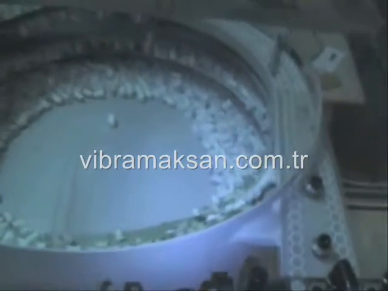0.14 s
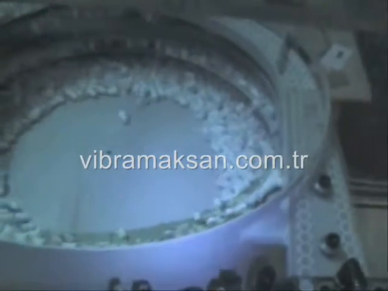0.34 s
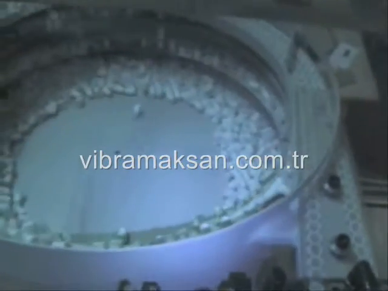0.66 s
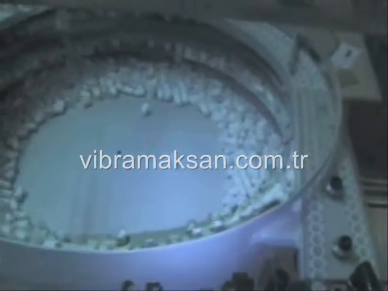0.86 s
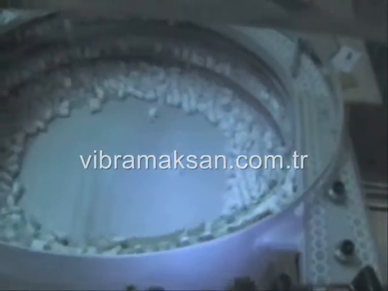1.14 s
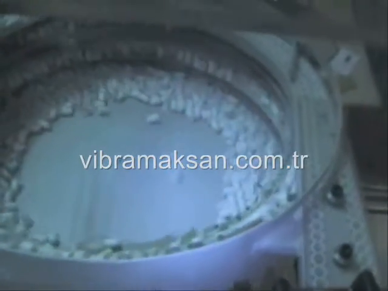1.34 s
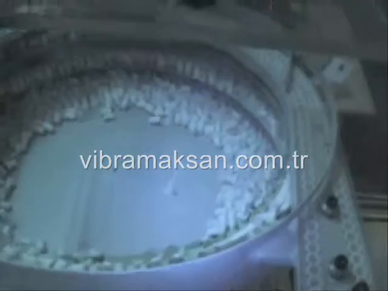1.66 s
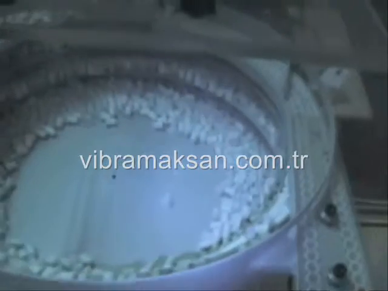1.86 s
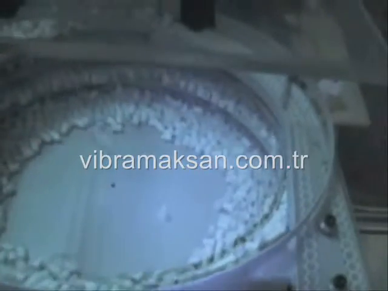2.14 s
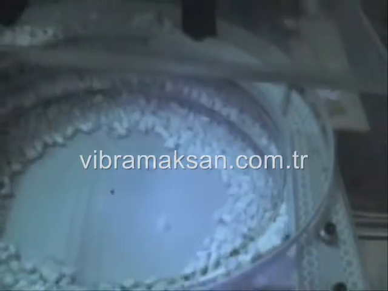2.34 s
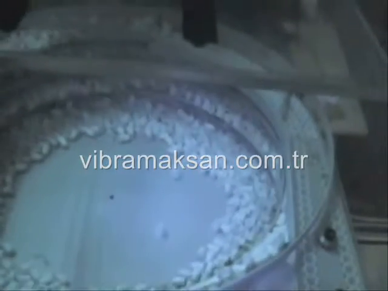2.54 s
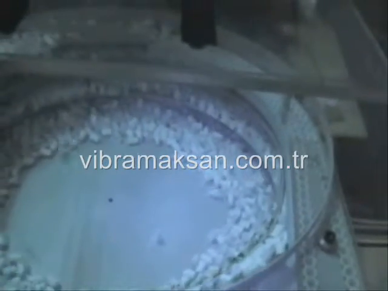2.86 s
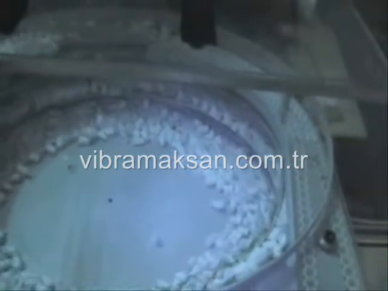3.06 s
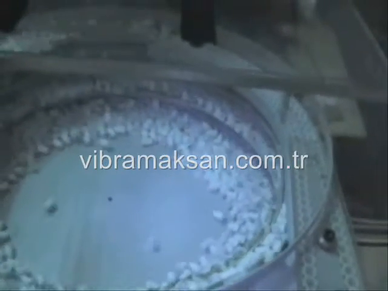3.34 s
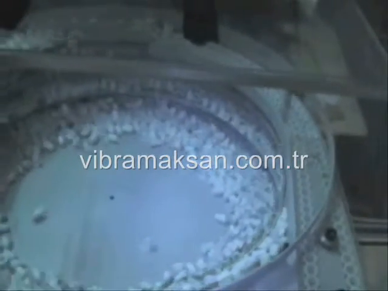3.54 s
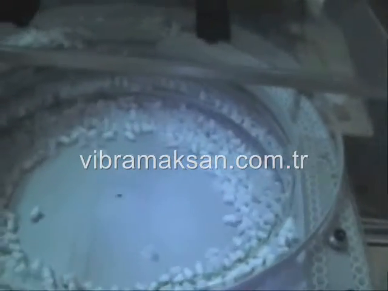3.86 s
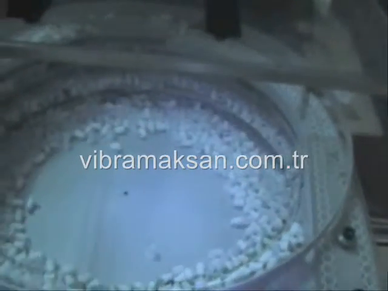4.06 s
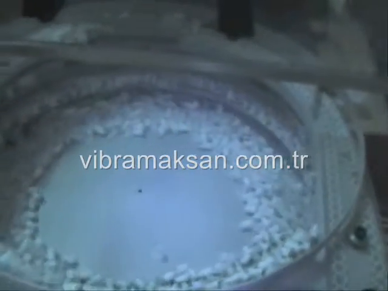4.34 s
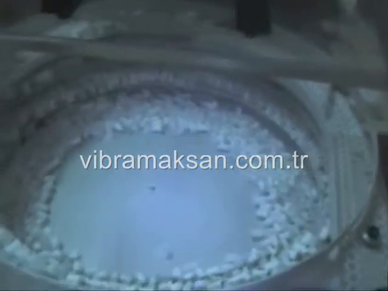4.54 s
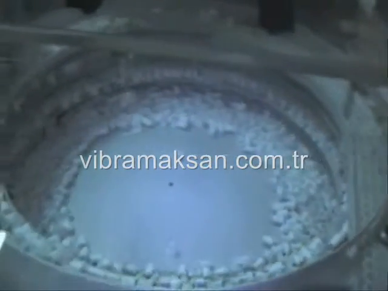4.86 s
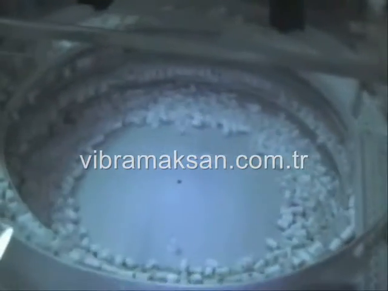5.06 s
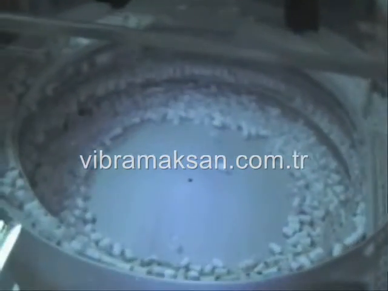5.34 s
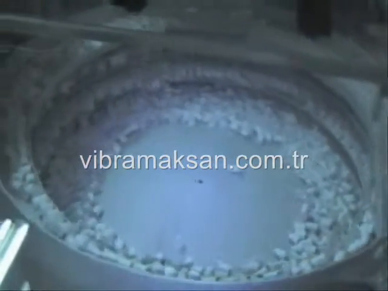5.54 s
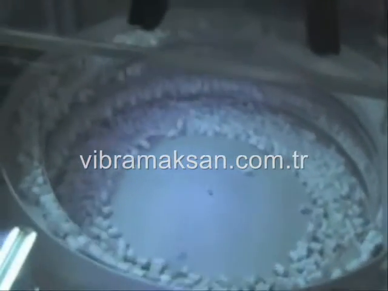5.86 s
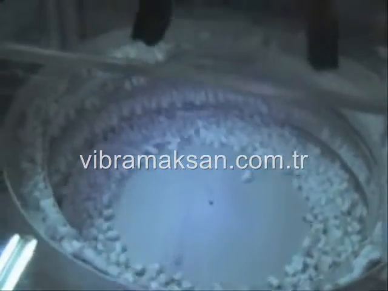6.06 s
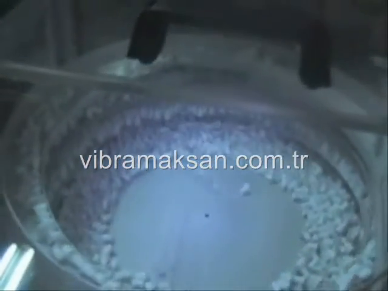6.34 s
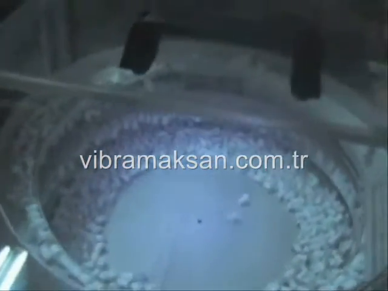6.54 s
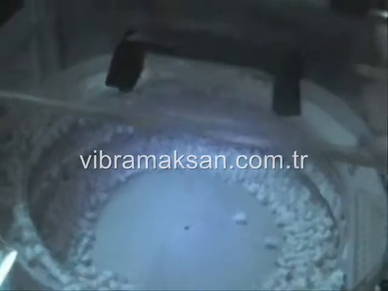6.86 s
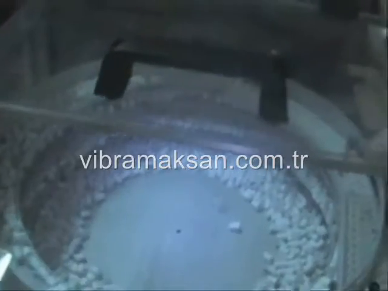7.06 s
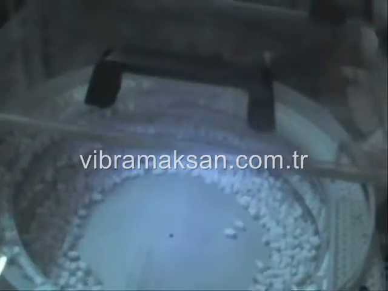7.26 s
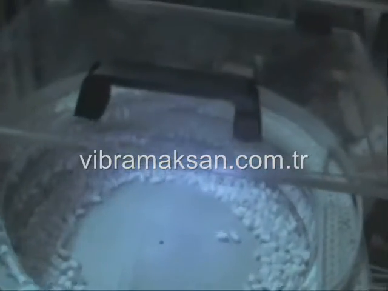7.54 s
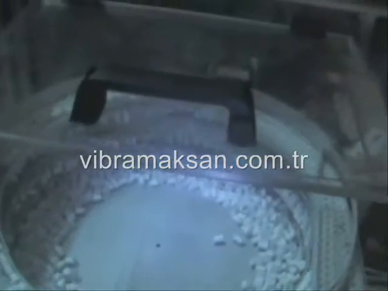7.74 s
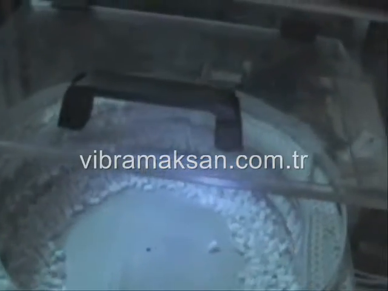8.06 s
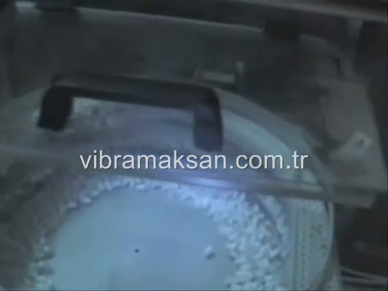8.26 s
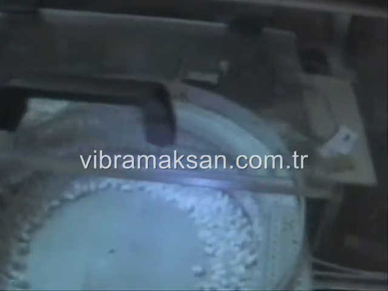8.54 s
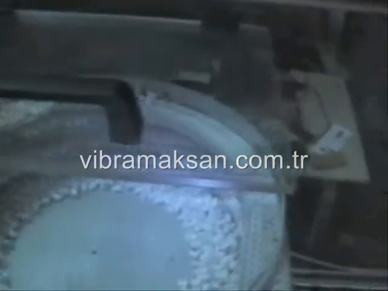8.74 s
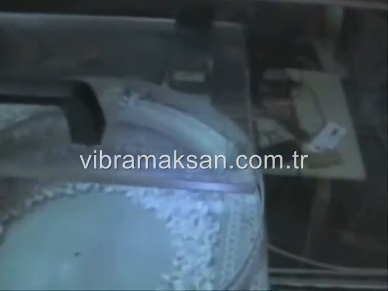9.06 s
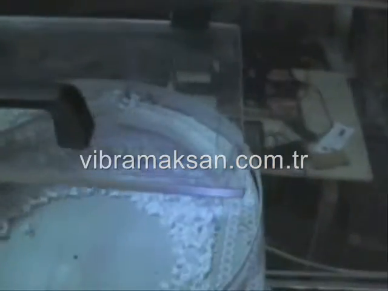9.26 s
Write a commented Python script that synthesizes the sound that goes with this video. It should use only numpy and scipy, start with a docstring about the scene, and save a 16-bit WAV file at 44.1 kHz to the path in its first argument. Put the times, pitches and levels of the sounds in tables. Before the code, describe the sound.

A vibratory bowl feeder runs from start to finish, about nine and a half seconds, heard close up on a factory floor. The main sound is a dense, bright, hissy rattle of hundreds of small plastic parts hopping in a steel bowl, which rings faintly under them. With it comes a steady, mid-pitched electric buzz and a hollow drumming from the bowl's floor. Other machines hum softly behind. Single parts drop with light clicks, half buried in the rattle, several in the first four seconds and a few more around 5.7 and 7 seconds. From about 3.7 to 8.5 seconds the microphone draws back, and the buzz and rattle soften just a little. Around 9 seconds the tone of the buzz and the metallic ring shifts slightly, while the machine keeps running at the same pace.

```python
"""Vibratory bowl feeder, close up

On a factory floor, a hand-held stereo microphone stays close to the feeder's clear cover, draws back,
then swings past the rim. A magnet tugs the steel bowl once per mains cycle: the bowl buzzes, and hundreds
of small plastic parts hop and land on every stroke, ringing the bowl and the space under the cover.
Now and then a part drops off the track. Other machines hum in the background."""
import sys
import numpy as np
from scipy import signal
from scipy.fft import rfft, irfft
from scipy.io import wavfile

SR = 44100
rng = np.random.default_rng(int(sys.argv[2]) if len(sys.argv) > 2 else 0)


def wav_record(signal):
    """Record a signal, one row per channel, as 16-bit PCM in the file named by sys.argv[1]."""
    frames = np.transpose(np.atleast_2d(signal))
    bounded = np.clip(frames, -1, 1)
    # unit amplitude maps onto the largest positive 16-bit level
    quanta = np.round(bounded * 32767).astype(np.int16)
    wavfile.write(sys.argv[1], SR, quanta)


N = 414540
TIME, FREQ = np.arange(N) / SR, np.fft.rfftfreq(N, 1 / SR)

# overtones of the bowl's stroke: (multiple, level [dB])
OVERTONES = [(2, -47), (3, -43.2), (4, -42.7), (5, -44.2), (6, -33), (7, -31.4), (8, -31.4), (9, -36.2),
             (10, -25.7), (11, -35), (12, -41), (13, -25.6), (14, -46), (15, -36.1), (16, -38.5), (17, -48),
             (18, -42.3), (19, -51), (20, -43), (21, -46), (22, -44.5), (23, -49)]
# the loudest overtone's standing wave along the microphone's path: (time [s], relative level [dB])
DRONE_PATH = [(0, -24.5), (0.6, -24.5), (1.5, -26.5), (3.8, -25), (6.2, -27.5), (7.6, -25.5), (8.0, -27.5),
              (8.8, -25.5), (9.2, -31)]
# nodes and bellies of the overtones past the rim: (multiple, change [dB])
PAST_RIM = [(6, -2.5), (7, 1.2), (8, -2.5), (9, 1.8), (12, 4.5), (14, 10), (16, 3), (17, -6), (18, 2)]
# colour of a part's landing: (frequency [Hz], level [dB])
LANDING_COLOUR = [(500, -4.5), (950, -5), (1100, 1), (1250, -0.8), (1400, 0.75), (2400, 2.5), (2950, -2.5),
                  (3900, -3), (4900, -2), (6400, -1.9), (8300, -3), (10000, -4.5), (11100, -6.5),
                  (12300, -16), (13000, -33)]
# modes of the steel bowl, each loudest as the microphone passes over its belly:
# (frequency [Hz], width [Hz], relative level [dB], loudest at [s], for about [s])
BOWL_MODES = [(1122, 29, -5.5, 1.6, 12), (1440, 43, 5, 8.9, 3.2), (1703, 28, 4, 3.7, 1.6),
              (1880, 190, -5.5, 3.2, 3.8), (2197, 20, 2, 2.2, 6.7), (2420, 25, -16, 3.5, 12),
              (2625, 68, 2, 1.1, 1.4), (3110, 62, -1.5, 6.7, 3.7), (3550, 62, 2.5, 0.95, 2),
              (3618, 33, 1.5, 5.5, 12), (4320, 60, 4.5, 0.96, 3.2), (4590, 50, 0, 8.6, 6.1),
              (4820, 150, 0, 3.7, 4.4), (6010, 190, -1, 1.2, 7.7), (6070, 150, 1.5, 9.4, .8),
              (6600, 160, 1, 9, 1), (6320, 130, -1, 2.9, 5.8), (7330, 390, -3.5, 2.4, 14),
              (8100, 170, -7, .8, 4), (8850, 130, 1, 4.9, 7.2), (10000, 230, 0, 3.3, 0.92),
              (9920, 140, 1, 9, 1.5)]
# sharp ticking that beams up out of the bowl, along the microphone's path: (time [s], level [dB])
TICKING_PATH = [(0, -25), (2.6, -24.5), (3.4, -23), (4.7, -23.3), (5.3, -24.5), (7.2, -23.5), (7.9, -25.0),
                (9.4, -26.5)]
# brief swells and lulls of the rattle: (time [s], length [s], change [dB])
RATTLE_SURGES = [(1.09, .08, 1.7), (3.57, 0.13, -1.2), (4.146, .12, 1.7)]
# colour of the bowl's floor drumming under the load: (frequency [Hz], level [dB])
FLOOR_COLOUR = [(25, -24.5), (110, -22.5), (160, -18), (220, -9.5), (300, -12.5), (420, -7), (490, -4),
                (550, 2.5), (590, 0), (630, -7.5), (770, -12), (835, -2), (930, -17.5), (2000, -39)]
# single parts dropping off the track: (time [s], relative level [dB])
PART_DROPS = [(0.3454, -16), (0.839, -13), (0.9824, -13), (1.0254, -14), (1.7659, -10), (2.266, -9),
              (3.047, -14), (3.4732, -14), (3.9164, -18), (5.6286, -17), (5.7494, -12), (6.9195, -10),
              (7.0918, -10), (8.7814, -19)]
# hums of the neighbouring machines: (frequency [Hz], level [dB])
MACHINE_HUMS = [(98.25, -54.5), (228.4, -38.3), (685.2, -44), (865.6, -42.5)]
# stereo width at the microphone: (frequency [Hz], side relative to mid [dB])
STEREO_WIDTH = [(30, 0), (70, 1), (200, -13), (500, -11), (1000, -11.5), (2000, -12.5), (4000, -7.5),
                (8000, -7), (12000, -3.5)]

STROKE_HZ = 50.005
DRONE_MULTIPLE = 13  # the loudest overtone
FILLING_MULTIPLES = (2, 3, 4, 5, 10, 11, 12, 14, 15)  # fill the space under the cover and do not fade
DRAW_BACK_START_S, DRAW_BACK_END_S = 3.7, 8.5
BUZZ_FADE_DB_PER_S, DRUM_FADE_DB_PER_S, RATTLE_FADE_DB_PER_S = 0.58, 0.5, 0.14  # while drawing back
SWING_MIDDLE_S, SWING_LENGTH_S = 9.35, .4


def bowl_buzz(waver=0.025, load_waver=0.01, wander_db=0.36, gain_db=0.17, steps=2048):
    """One tug a stroke gives a stack of overtones; the shifting load makes each waver."""
    slow_time = np.linspace(0, N / SR, steps)
    jitter = signal.lfilter([1], [1, -.85], rng.standard_normal((len(OVERTONES), 2, steps))) / 2
    load = 1 + load_waver * walk(22)
    out = np.zeros((2, N))
    for (multiple, db), (shiver, slip) in zip(OVERTONES, jitter):
        hz = multiple * STROKE_HZ
        drift_db = wander_db * multiple / DRONE_MULTIPLE * walk(2, slow_time)  # higher ones wander more
        level_db = db + gain_db + standing_wave(multiple, slow_time) + drift_db
        strength = np.interp(TIME, slow_time, undb(level_db) * (1 + waver * shiver))
        phase = 2 * np.pi * hz * TIME + np.interp(TIME, slow_time, waver * slip - bowl_lag(hz))
        tone = np.sqrt(2) * strength * np.cos(phase)
        lean = 0.034 * (-1) ** multiple  # standing waves leave left and right a little unequal
        out[0] += (1 + lean) * tone
        out[1] += (1 - lean) * tone
    return out * load


def bowl_lag(hz, lag_s_per_hz=4e-5, mode_hz=545, width_hz=30):
    """Radians behind the tug: higher overtones travel longer, and the floor's main mode turns them."""
    return np.pi * lag_s_per_hz * hz ** 2 + 2 * np.arctan(2 * (hz - mode_hz) / width_hz)


def standing_wave(multiple, t):
    """Change of one overtone in dB as the microphone draws back and swings past the rim."""
    if multiple == DRONE_MULTIPLE:
        path_db = np.interp(t, *np.transpose(DRONE_PATH))
    else:
        path_db = -BUZZ_FADE_DB_PER_S * drawn_back(t) * (multiple not in FILLING_MULTIPLES)
    swing = np.clip((t - SWING_MIDDLE_S) / SWING_LENGTH_S + .5, 0, 1)
    return path_db - path_db.mean() + swing * dict(PAST_RIM).get(multiple, 0)


def parts_rattle(stretches=3, surge_db=0.33, clatter_db=-23, rattle_db=-19):
    """Parts land all around the bowl; each stretch of the heap has its own surges and reflections."""
    mid, side = 0, 0
    for _ in range(stretches):
        hits = landings(per_second=4200, bunching=.27, scatter_db=10.5) * undb(surge_db * walk(28))
        mid += signal.oaconvolve(hits, cover_response(t60_s=0.082, direct=0.5))[:N]
        side += signal.oaconvolve(hits, cover_response(t60_s=0.094, direct=0.092))[:N]
    steel = bowl_ring(unit(landings(per_second=2500, bunching=.3, scatter_db=13.6)))
    spectrum = stereo(rfft(unit(mid) + steel), rfft(unit(side)) * 0.94) * colour(LANDING_COLOUR)
    swell_db = sum(db * np.exp(-(2 * (TIME - s) / length) ** 2) for s, length, db in RATTLE_SURGES)
    heap_db = swell_db - RATTLE_FADE_DB_PER_S * drawn_back(TIME)
    ticking_db = np.interp(TIME, *np.transpose(TICKING_PATH))
    # flat faces clatter low and corners tick high, each in its own flurries
    clatter = unit(band(spectrum, 280, 2880)) * undb(clatter_db + heap_db + 0.62 * walk(35))
    rattle = unit(band(spectrum, 2930, 7550)) * undb(rattle_db + heap_db + 0.41 * walk(45))
    ticking = unit(band(spectrum, 7800, 28000)) * undb(ticking_db + 0.48 * walk(70))
    return clatter + rattle + ticking


def landings(per_second, bunching, scatter_db, flight_s=.006):
    """Random impacts that crowd into the part of every stroke where the bowl rises to meet the parts."""
    when, luck, polarity, height = rng.random((N // 4, 4)).T
    at = (when * N).astype(int)
    crowding = 1 + bunching * np.cos(2 * np.pi * STROKE_HZ * (at / SR - flight_s))
    lands = luck < per_second * N / SR / len(at) * crowding
    # most hops are low, and none can be higher than the stroke throws it
    return np.bincount(at, lands * np.sign(polarity - .5) * undb(scatter_db * height ** 3), N)


def bowl_ring(hits, gain_db=1, focus=0.56):
    """Landings ring the bowl's modes; each swells and fades along the microphone's path."""
    out = 0
    for hz, width, db, s, length in BOWL_MODES:
        b, a = signal.iirpeak(hz, hz / width, fs=SR)
        nearness = (1 + (2 * (TIME - s) / length) ** 2) ** -focus
        out += signal.lfilter(b, a, hits) * undb(db + gain_db) * nearness
    return out


def cover_response(t60_s, direct, ripple=0.22, samples=8192):
    """The direct click from one place in the bowl, then dense reflections between bowl and cover."""
    echoes = rng.standard_normal(samples) * np.exp(-np.log(1000) * TIME[:samples] / t60_s)
    echoes /= np.linalg.norm(echoes)
    echoes[0] += direct
    # the reflections smear the click in time and leave a mild ripple in its colour
    response = rfft(echoes)
    return irfft(response / abs(response) ** (1 - ripple), samples)


def floor_drumming(level_db=-28.0):
    """The weight of the heap, falling back on every stroke, drums on the bowl's floor."""
    mid, side = (rfft(landings(per_second=3000, bunching=.5, scatter_db=11.5)) for _ in range(2))
    drumming = unit(irfft(stereo(mid, side) * colour(FLOOR_COLOUR), N))
    return drumming * undb(level_db - DRUM_FADE_DB_PER_S * drawn_back(TIME))


def dropping_parts(gain_db=-7, bounce=.25):
    """A part falls off the track with a brighter click and bounces on the next stroke."""
    hits = np.zeros(N)
    for s, db in PART_DROPS:
        hits[int(s * SR)] += undb(db)
        hits[int((s + 1 / STROKE_HZ) * SR)] += bounce * undb(db)
    mid, side = (rfft(cover_response(t60_s=0.094, direct=.15), N) for _ in range(2))
    brightening = 1 + np.minimum(FREQ / 5000, 2) ** 2
    click = stereo(mid, side) * colour(LANDING_COLOUR) * brightening
    attack_rms = np.std(irfft(click, N)[:, :SR // 200])  # first 5 ms
    return irfft(rfft(hits) * click, N) * undb(gain_db) / attack_rms


def factory_hum():
    """Neighbouring machines hum, wavering slightly; the lowest beats slowly against the feeder."""
    return sum(np.sqrt(2) * undb(db + .9 * walk(4)) * np.cos(2 * np.pi * hz * TIME)
               for hz, db in MACHINE_HUMS)


def drawn_back(t):
    """Seconds for which the microphone has been drawing back."""
    return np.clip(t, DRAW_BACK_START_S, DRAW_BACK_END_S) - DRAW_BACK_START_S


def stereo(mid, side):
    """Left and right spectra: wide in the deep bass, narrow in the middle, wider again in the treble."""
    return mid + side * colour(STEREO_WIDTH) * np.array([[1], [-1]])


def band(spectrum, lo_hz, hi_hz):
    """The part of a spectrum between two soft edges, as sound."""
    gain = 1 / (1 + (FREQ / hi_hz) ** 10) - 1 / (1 + (FREQ / lo_hz) ** 10)
    return irfft(spectrum * gain, N)


def colour(points):
    """Gain at every frequency from (frequency [Hz], level [dB]) points."""
    hz, db = np.transpose(points)
    return undb(np.interp(np.log(FREQ + 1), np.log(hz), db))


def walk(rate, t=TIME):
    """Random drift with a spread near 1, turning about rate times a second."""
    steps = rng.standard_normal(1024)
    return np.interp(t * rate, np.arange(len(steps)), steps) * np.sqrt(3 / 2)


def undb(db):
    """Decibels to gain."""
    return 10 ** (np.asarray(db) / 20)


def unit(x):
    """Scale to rms 1."""
    return x / np.sqrt(np.mean(x ** 2))


def scene():
    """The feeder close by, the factory's hum behind it."""
    return bowl_buzz() + floor_drumming() + parts_rattle() + dropping_parts() + factory_hum()


def record(dry):
    """The microphone is a little duller on the left; peaks are rounded and the top is cut steeply."""
    ceiling, top_hz = .78, 12450
    tilt = colour([(4500, 0), (8000, 0.29), (12000, 1.0)])
    heard = irfft(rfft(dry) * np.array([1 / tilt, tilt]), N)
    rounded = heard / (1 + (heard / ceiling) ** 8) ** (1 / 8)
    return signal.sosfilt(signal.ellip(12, .1, 90, top_hz, fs=SR, output="sos"), rounded)


dry = scene()
out = record(dry)
wav_record(out)
```